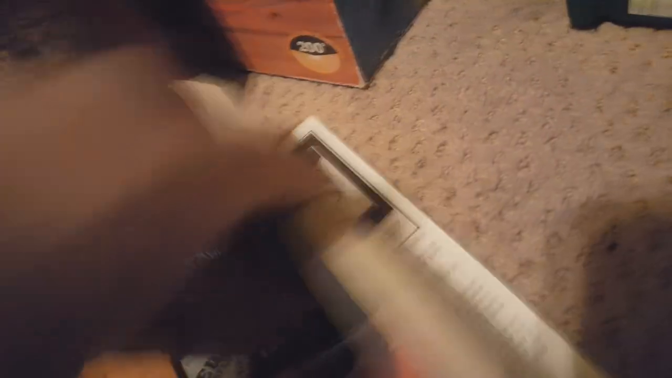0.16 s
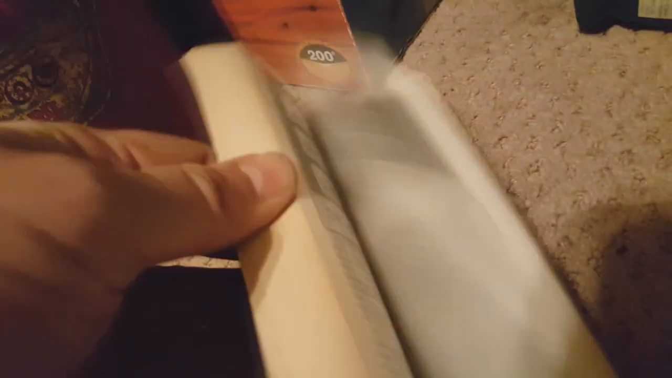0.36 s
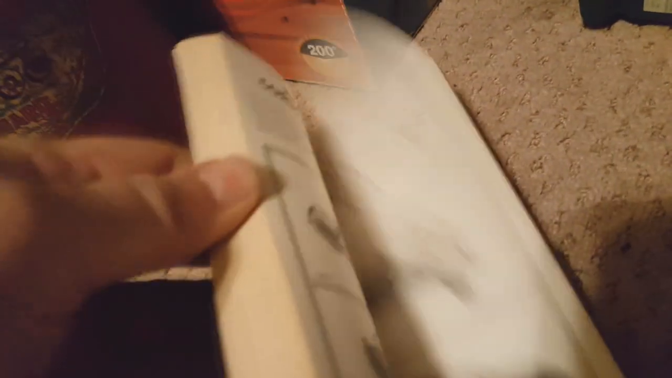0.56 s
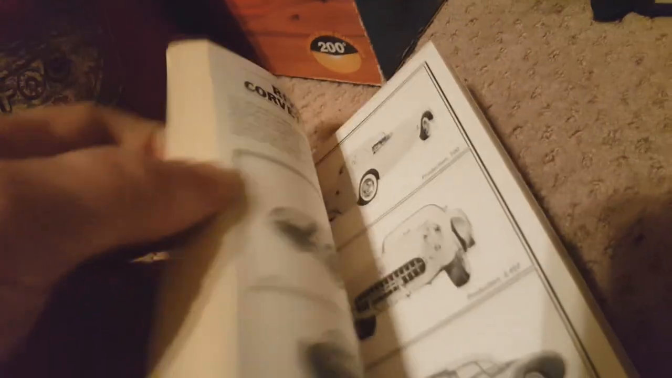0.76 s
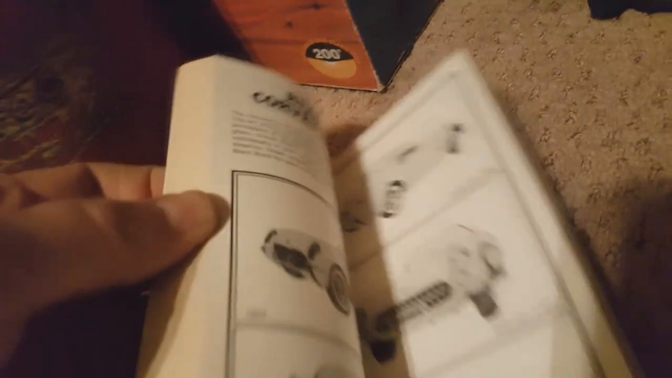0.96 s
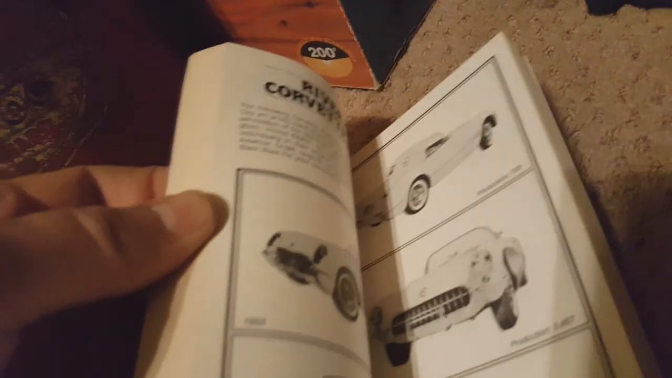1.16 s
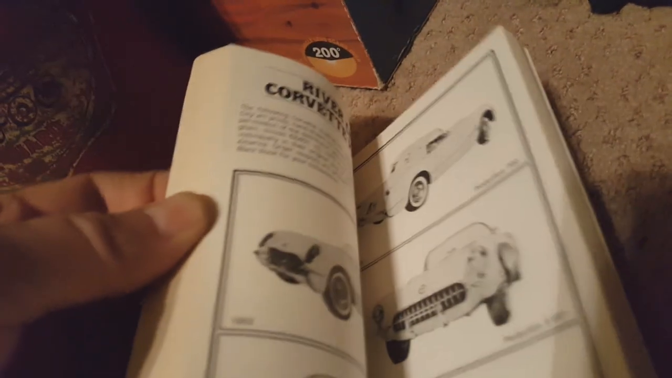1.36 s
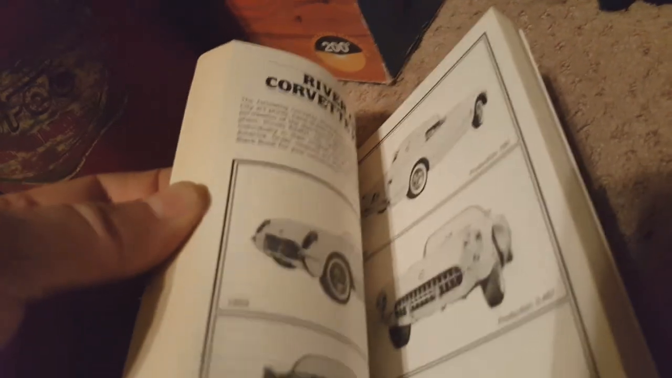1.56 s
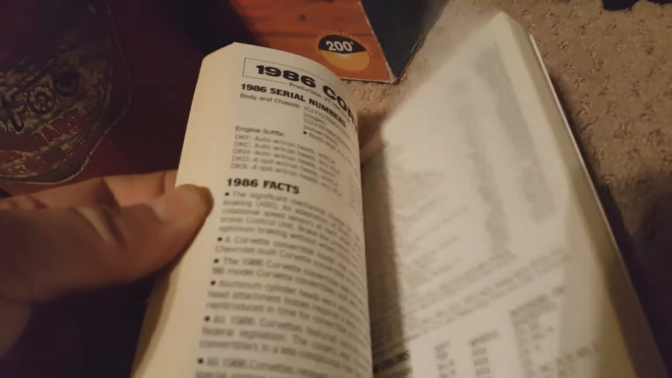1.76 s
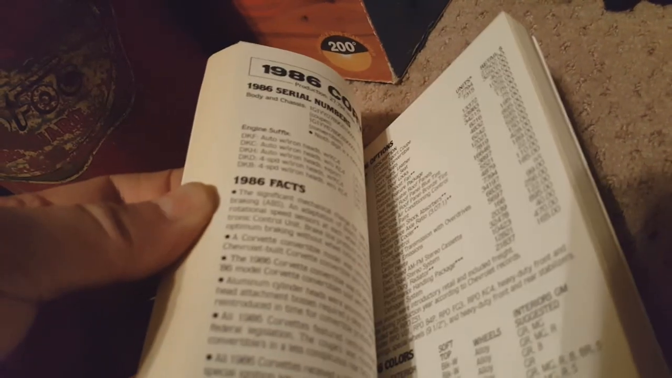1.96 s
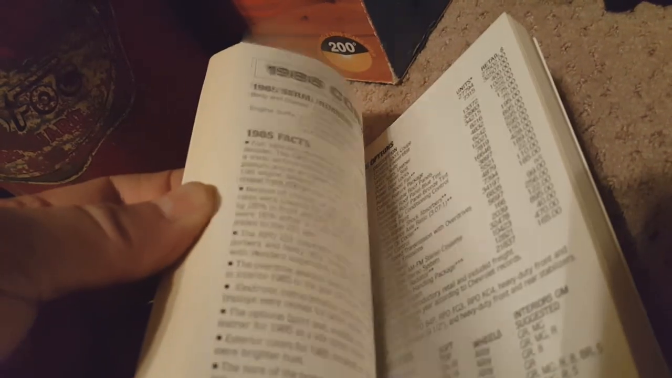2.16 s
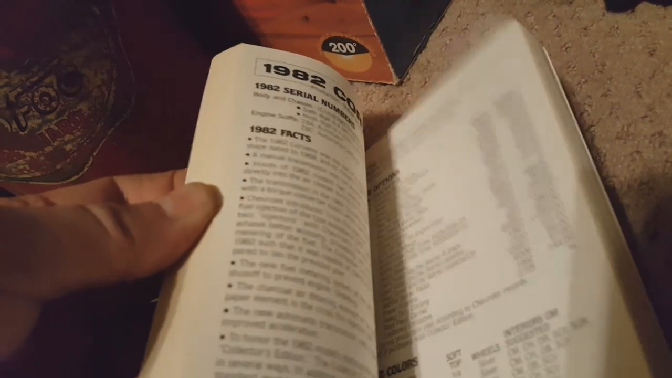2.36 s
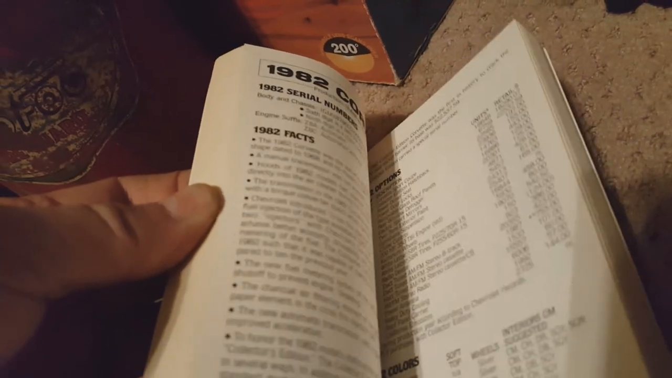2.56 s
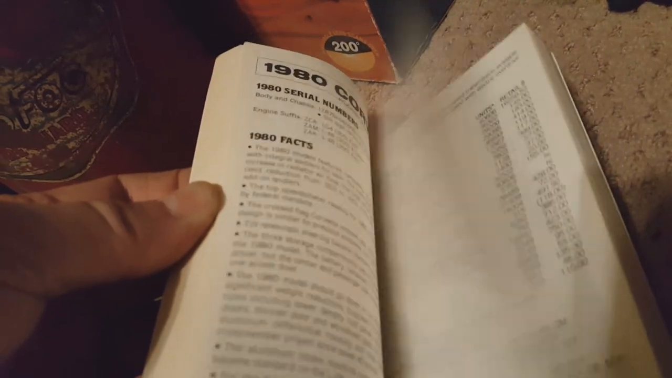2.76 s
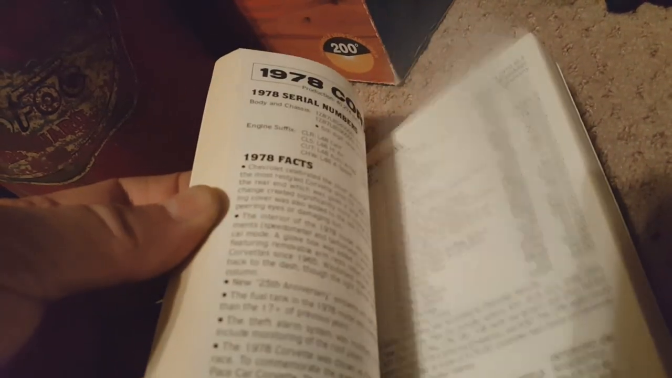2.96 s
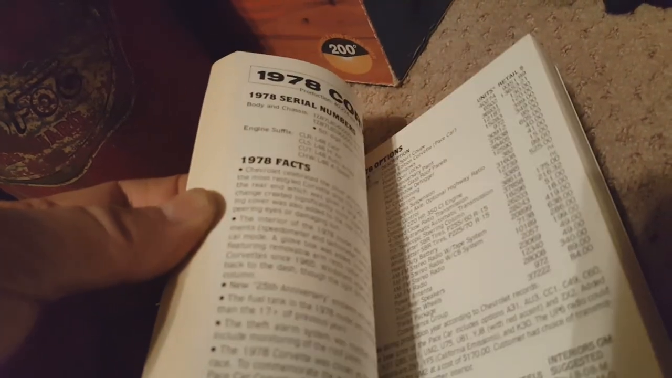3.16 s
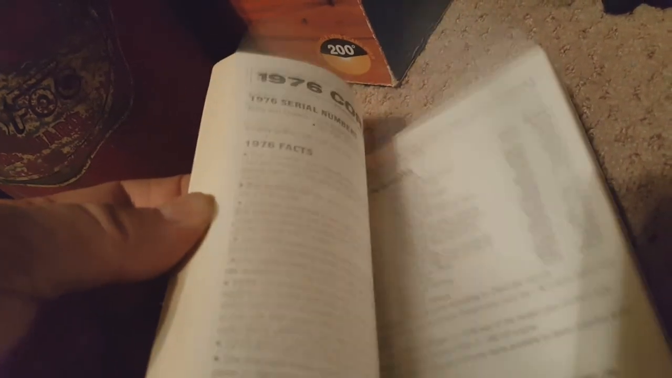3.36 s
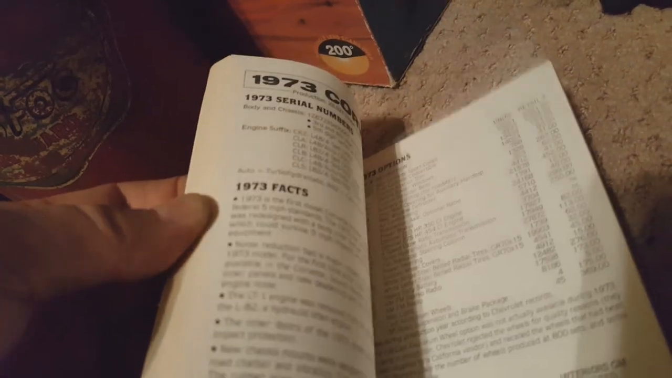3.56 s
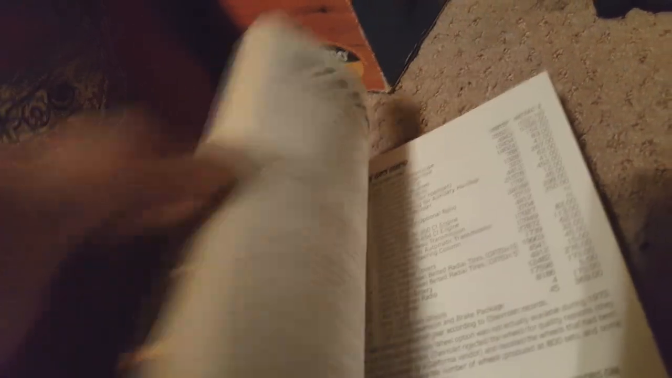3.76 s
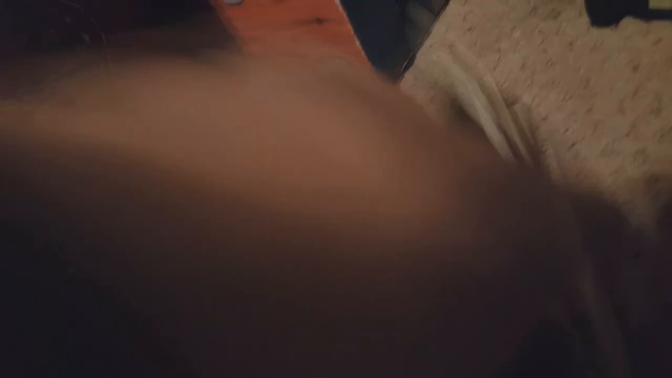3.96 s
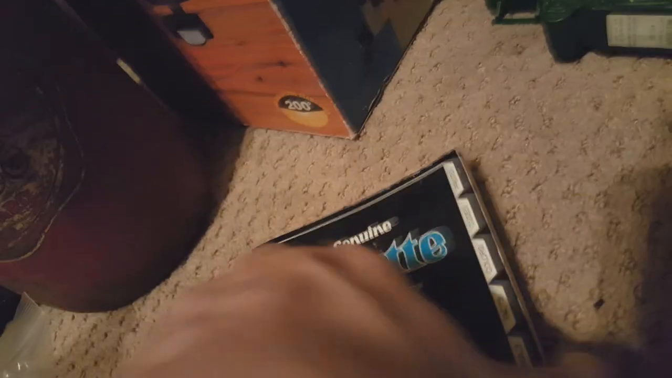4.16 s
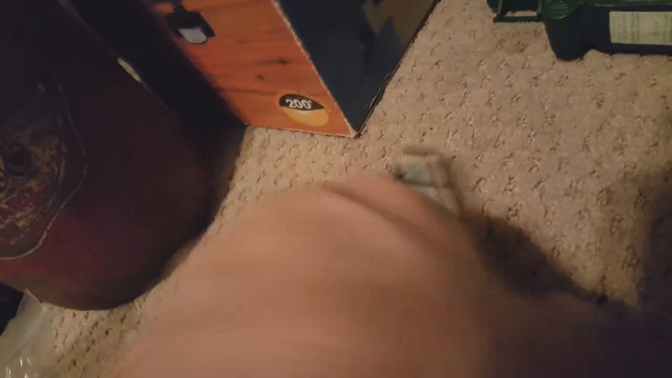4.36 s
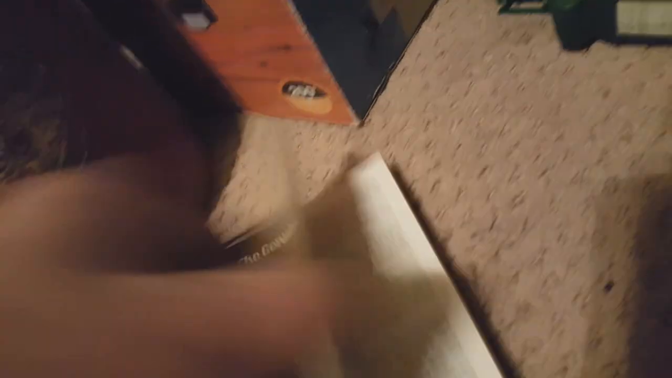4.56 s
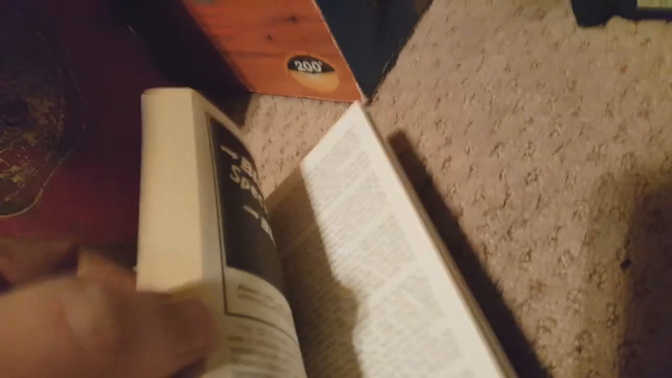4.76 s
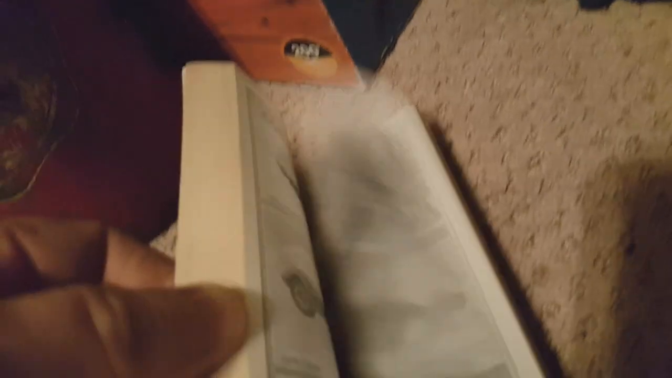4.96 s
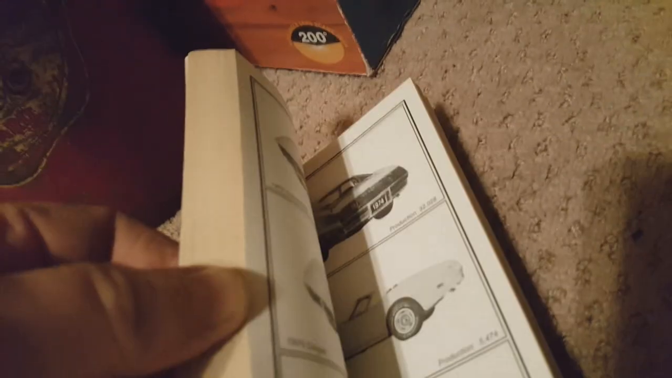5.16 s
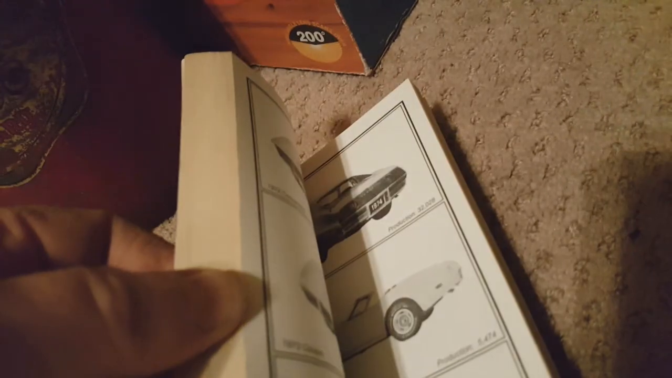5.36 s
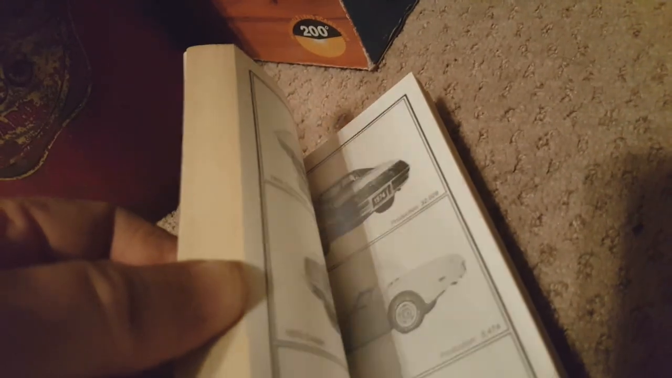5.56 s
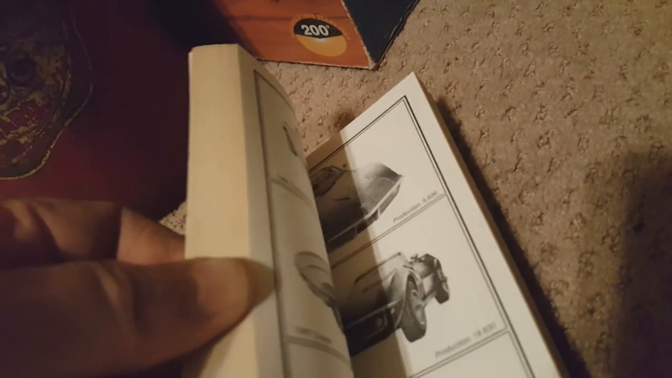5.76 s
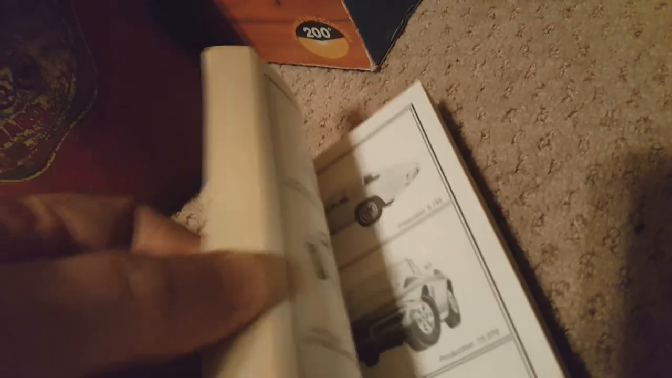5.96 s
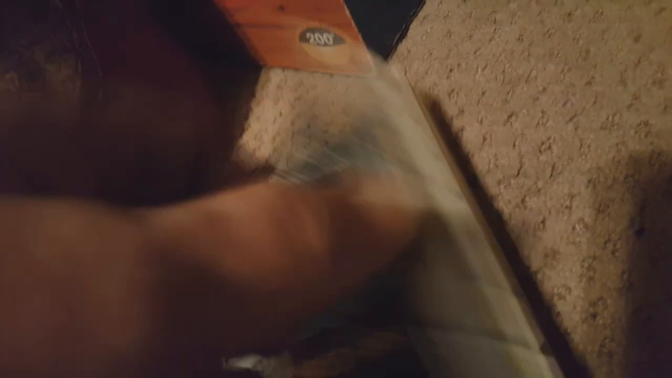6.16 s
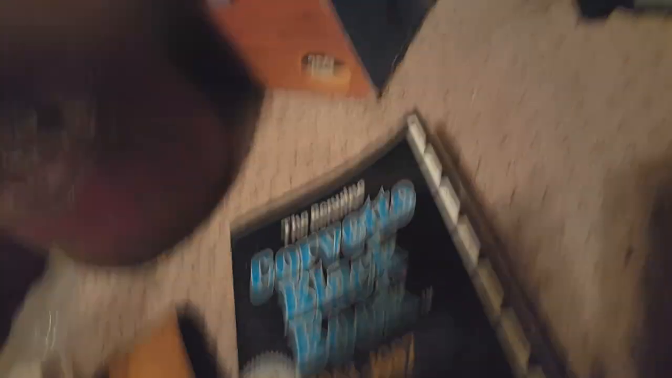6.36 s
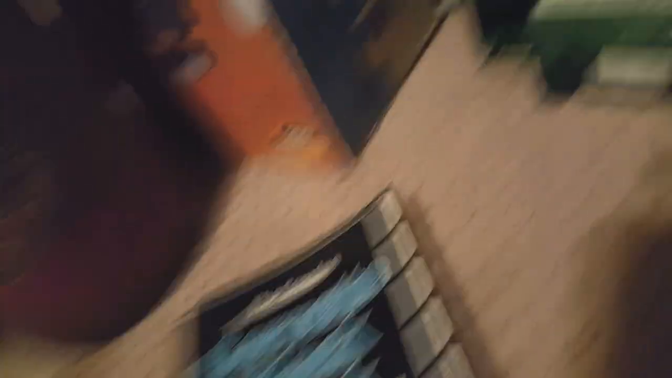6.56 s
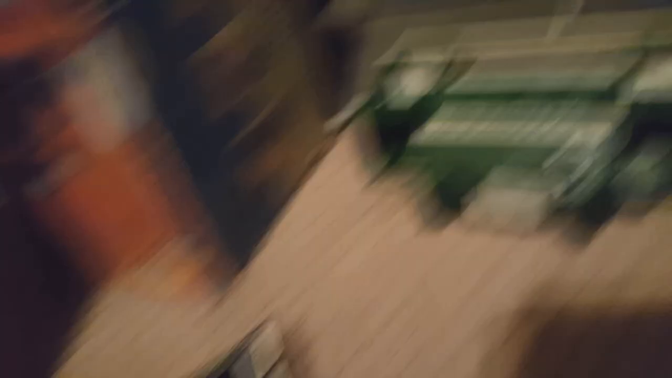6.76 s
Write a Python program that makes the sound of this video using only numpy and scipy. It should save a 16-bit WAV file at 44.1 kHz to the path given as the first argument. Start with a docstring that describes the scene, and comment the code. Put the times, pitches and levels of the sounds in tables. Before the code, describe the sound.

Dry, close paper sounds in a small carpeted room: a rustle and a burst of snapping page edges, then sparse page turns and another short flurry. A hand swishes over the cover with small knocks, the bent binding crackles and creaks, several pages are flipped, the book closes with a soft slap, and the handheld microphone gets bumped. Low room hum and slight hiss stay underneath.

```python
"""Thumbing through a paperback

A paperback lying on a carpet is opened twice and thumbed through, close to a handheld camera.
Page edges snap as short noise bursts; sliding sheets and rubbing skin are friction noise under strokes.
Stick-slip impulses ring the modes of the creaking cover; falling pages puff low noise at the right port.
At the end the book slaps shut and the camera is bumped: decaying sines with thuds and ticks.
A short room tail and a steady low drone with faint hiss lie behind."""
import sys
import numpy as np
from scipy import signal
from scipy.fft import rfft, irfft
from scipy.io import wavfile
from scipy.ndimage import uniform_filter1d

SR = 44100
rng = np.random.default_rng(int(sys.argv[2]) if len(sys.argv) > 2 else 0)


def transcribe(signal):
    """Save signal, clipped to [-1, 1], as a 16-bit WAV file at the path in sys.argv[1]."""
    frames = np.atleast_2d(signal).T
    limited = np.clip(frames, -1, 1)
    pcm = np.round(limited * 32767).astype(np.int16)
    wavfile.write(sys.argv[1], SR, pcm)


N = 304145  # length [samples]

# Levels in the tables are relative: the function that reads one may add an overall trim.
# Page edges snapping off the thumb:
# (time [s], level [dB], hollow between the pages [dB], brightness [dB])
FLICKS = [(.358, -22, 10.5, -6), (0.3892, -16.5, 9, -6), (0.3926, -9, -3, -11), (0.422, -16, 6, -3),
          (.424, -11, -3, -10), (0.4455, -12, 5, -13), (.463, -11, -4, -5), (.4814, -10, -0.5, -7),
          (0.5759, -9, -1.5, -7), (0.5876, -6, -7, -5), (0.5915, -9, 4, -7), (0.6031, -5, -11, -10),
          (0.6092, -9, -3, -11), (.614, -5.5, -0.5, -7), (0.623, -7.5, -6, -8), (1.6801, -11.5, 2, -8.5),
          (1.7714, -15, 3.5, -3), (2.24, -14, 2.5, 0.5), (2.3139, -11, 0, -4), (2.3597, -12.5, -1, -1),
          (2.702, -12.5, 2.5, -3.5), (2.8131, -12, 2.5, 0), (2.8823, -10, 0, 1), (2.9558, -26, 5, -16),
          (2.966, -6, -2, 1.5), (3.2836, -21, 6.5, -11), (3.3501, -16.5, 0.5, -1),
          (3.3792, -10.5, -4, -3.5), (3.4461, -9, 0.5, -10), (3.4689, -8, -1, -6.5), (3.959, -21.5, -2, -1),
          (4.014, -15.5, -0.5, 0), (5.0063, -14, 16.5, -9), (5.032, -19, 7, -6), (5.065, -14, 9, -2),
          (5.121, -10, 9, -6.5), (5.658, -12, 15.5, -2.5), (5.7149, -12, 2.5, -4.5), (5.9264, -14, 8, 1.5),
          (6.1186, -16, -3.5, -5.5)]
# Single stick-slip events of the bent cover: (time [s], level [dB])
SLIPS = [(4.532, -7.5), (4.5467, -19), (4.567, -3.5), (4.5873, -12), (4.5938, -2.5), (4.6053, -7),
         (4.639, 4), (4.6432, 0.5), (4.6511, -7), (4.6982, -12), (4.7002, 0), (4.714, -9), (4.7188, -9.5),
         (4.7833, -3.5)]
# Slips running together as the cover is forced: (time [s], level of one slip [dB])
CREAK = [(4.569, -20.5), (4.692, -22), (4.717, 2), (4.755, 2), (4.783, -3), (4.796, -31)]
# Dull blows on book and camera:
# (time [s], level [dB], pitch [Hz], ring t60 [s], tick level [dB], floor shudder level [dB])
KNOCKS = [(.1830, -21, 656, 0.031, -19, -24), (.1885, -24, 683, 0.026, -19, -34),
          (0.314, -38, 282, 0.029, -28, 3.5), (4.092, -35, 125, 0.029, -10, -9),
          (4.102, -31.5, 265, 0.015, -7, -3), (4.181, -32.5, 415, 0.0059, -9, -12),
          (6.217, -30.5, 1263, 0.027, -28, -25), (6.2925, -9, 262, 0.0087, -24.5, -10),
          (6.2978, -20, 477, 0.007, -19, -3.5), (6.652, -48, 908, 0.02, -17, 0),
          (6.7598, -31, 357, 0.1, -2.5, -4.5), (6.7655, -37, 430, 0.026, -2, 10.5),
          (6.777, -31.5, 313, 0.044, -3.5, -9)]
# Modes that a blow shakes in the shut book and the floor: (frequency [Hz], level [dB], t60 [s])
FLOOR_MODES = [(148, -13.5, 0.11), (187, -17.5, 0.044), (260, -34.5, 0.36), (319, -21, 0.1),
               (444, -18, 0.17), (558, -26.5, 0.088)]
# Air from a falling page hitting the right port:
# (time [s], level [dB], upper edge of the push [Hz], decay time of the wake [s])
PUFFS = [(1.926, -36.5, 156, 0.061), (2.466, -26.5, 236, 0.039), (2.987, -41, 150, 0.034),
         (3.045, -35, 141, 0.018), (3.592, -25, 242, 0.016)]
# Small dry ticks of a buckling sheet: (time [s], level [dB])
TICKS = [(0.2293, -15.5), (0.7747, -19.5), (1.447, -33.5), (1.485, -31), (1.57, -33), (1.582, -39),
         (2.642, -33), (2.779, -26), (3.614, -25), (6.134, -17), (6.174, -16.5)]
# Sheets sliding over paper: (time of greatest speed [s], level [dB], rise [s], fall [s],
# body [dB], brightness [dB], left-right difference [dB])
SHEET_STROKES = [(.18, -39, 0.17, 0.21, 1, -10, -0.5), (.39, -44, 0.089, .1, 2.5, -7.5, -3),
                 (.452, -31.5, .028, 0.026, -5, -10.5, 1.5), (.605, -35.5, 0.02, 0.021, 0, -3, 0),
                 (0.734, -47, 0.084, 0.074, -0.5, -6, -0.5), (0.809, -46, .05, 0.037, 3.5, -8.5, -0.5),
                 (.92, -70.5, 0.074, 0.21, 2, 4, -1), (1.06, -47, .11, 0.18, -1, -18.5, -2.5),
                 (1.47, -61, 0.25, 0.12, 5, -10.5, -1), (1.555, -52, 0.038, 0.058, 5.5, -24, 1),
                 (1.76, -58, 0.021, .025, 8, -13, 2), (2.325, -58, 0.023, 0.054, 10, -9, -2),
                 (2.875, -50.5, .025, 0.018, 3, -13, -1), (3.23, -60, 0.17, 0.065, 0.5, -17, 0),
                 (3.289, -44, 0.0046, 0.016, 11, -8, 0), (3.34, -47.5, 0.047, 0.072, 2, -12.5, 0),
                 (3.531, -44.5, 0.037, 0.044, 5, -8, -3), (4.87, -54, .08, 0.095, 5, -18, -1),
                 (5, -46.5, 0.13, 0.1, 2.5, -11, -1.5), (6.05, -59, 0.21, .1, 2, -12.5, -2.5),
                 (6.165, -45, 0.082, .09, -1.5, -6.5, -2), (6.195, -33, 0.017, 0.023, -4.5, -10.5, -2),
                 (6.219, -38.5, 0.02, 0.0097, 0.5, -4, 0), (6.319, -46, 0.11, 0.071, 2, -16.5, -2)]
# A hand rubbing evenly over cover or camera: (time of mid stroke [s], level [dB], rise [s], fall [s],
# body [dB], brightness [dB], left-right difference [dB])
HAND_STROKES = [(3.82, -53.5, 0.06, .05, -3, -6.5, 0), (3.95, -42.5, .11, .15, -6.5, -14.5, -2.5),
                (4.04, -45.5, 0.024, .03, 1, -7.5, -5), (4.09, -42, 0.025, 0.037, 4, -3, 4.5),
                (4.145, -44, 0.035, 0.036, 3, -2, 4.5), (4.235, -43.5, 0.055, 0.056, 3.5, -17.5, -1.5),
                (4.36, -51.5, 0.069, .08, 7, -5, -1.5), (4.47, -42, 0.12, 0.13, -1, -15.5, -3),
                (4.66, -42, 0.16, 0.16, 7.5, -4, -3), (6.785, -41, 0.024, 0.031, 5.5, -2.5, 2.5),
                (6.86, -47.5, .05, 0.034, 10.5, -8, 0.5)]

# Resonances of the cover: (frequency [Hz], bandwidth [Hz], level [dB])
COVER_MODES = [(218, 9.8, -11), (446, 22.4, 2.5), (648, 37, 4.5), (956, 37, 1.5), (1250, 34, -5.5),
               (1560, 250, -23), (1726, 24, -1.5), (1850, 94, 7), (2277, 68, -1.5), (2683, 45, -4),
               (3192, 186, -0.5), (3160, 62, -6), (3277, 60, -4), (3800, 76, -1), (3975, 36, -0.5),
               (4170, 160, -10), (5440, 73, -4.5), (7750, 400, -43)]
# Spectrum of the dry crack of a slip: (frequency [Hz], level [dB])
CRACK_SPECTRUM = [(100, -18), (400, -7), (1000, -18), (1900, -3.5), (3800, -4.5), (5000, -20),
                  (8500, -18.5), (10000, -31.5), (15000, -27.5)]
# Spectrum of a page snap: (frequency [Hz], level [dB])
SNAP_SPECTRUM = [(30, -14), (120, -2.5), (470, 1.5), (740, -2.5), (1350, 4.5), (1900, 1), (2300, -1),
                 (2900, 0.5), (4500, -5), (5500, -1), (7000, -2.5), (8600, 1), (9900, -9.5), (12000, -8.5),
                 (15500, -9.5)]
# Spectrum of paper friction: (frequency [Hz], level [dB])
SLIDE_SPECTRUM = [(30, -16), (120, -22.5), (300, 2.5), (550, -2.5), (900, -2), (1500, 0.5), (1950, -1),
                  (2600, 0), (3500, 3.5), (4800, -0.5), (5500, 0), (8400, 0), (10000, -12.5), (12000, -9.5),
                  (15500, -11.5)]
# Spectrum of the steady background: (frequency [Hz], level [dB])
AIR_SPECTRUM = [(20, -20.5), (60, -6), (100, -2), (128, 1), (175, -13), (215, -0.5), (275, -8), (335, -6.5),
                (450, -14), (800, -21.5), (2000, -21.5), (5000, -29.5), (10000, -35.5), (15500, -30.5)]

# Correlation of friction and background noise at the two ports: (frequency [Hz], correlation [-1 to 1])
PORT_CORRELATION = [(50, 1), (150, 0.84), (320, 0.78), (700, 0.4), (1400, 0), (3000, 0.01), (7000, -0.01),
                    (15000, 0)]
# Stereo balance of snaps: (frequency [Hz], left-right difference [dB])
SNAP_BALANCE = [(100, -10.5), (450, -5), (800, -6), (1350, 1), (2400, 0), (4000, -5.5), (9000, 3),
                (15000, 2)]
# How the cover faces the two ports: (frequency [Hz], left-right difference [dB])
COVER_BALANCE = [(400, -3.5), (700, -3), (1500, -5), (2000, -0.5), (3000, -16), (4200, -5.5), (6000, -10),
                 (12000, 8)]
# Decay of the room: (frequency [Hz], t60 [s])
ROOM_T60 = [(120, 0.44), (500, 0.033), (2000, 0.093), (6000, 0.056), (15000, 0.15)]

# Reach of the body control of a stroke: (frequency [Hz], share [0 to 1])
BODY_REACH = [(800, 1), (1150, 0)]
# Reach of the hollow between pages: (frequency [Hz], share [0 to 1])
HOLLOW_REACH = [(480, 0), (850, .5), (1350, 1), (1950, 1), (2450, 0)]
# Reach of the low push of a flick: (frequency [Hz], share [0 to 1])
PUSH_REACH = [(480, 1), (780, 0)]
# Reach of the brightness of a snap: (frequency [Hz], share [0 to 1])
SNAP_TREBLE_REACH = [(5000, 0), (8000, 1)]
# Reach of the brightness of a stroke: (frequency [Hz], share [0 to 1])
SLIDE_TREBLE_REACH = [(1700, 0), (5500, 1)]

# A page arched over a rounder hollow scrapes less: [dB with no hollow], [dB per dB of hollow]
SCRAPE_DB, SCRAPE_PER_HOLLOW = -1, -1.05
# The low push grows more slowly than its snap: [dB], [dB per dB of snap level], [dB per dB of hollow]
PUSH_DB, PUSH_PER_LEVEL, PUSH_PER_HOLLOW = -2.5, -0.68, 0.19
# The glide of a flicked page over its neighbour: level against its snap, times and colour
GLIDE_DB, GLIDE_RISE_S, GLIDE_FALL_S, GLIDE_BODY_DB, GLIDE_BRIGHT_DB = -49, 0.038, 0.068, 4, -10.5
# Harder bending slips faster: mean-wait scale at 0 dB [slips/s], and the power of the force it follows
SLIPS_PER_S, RATE_POWER = 460, .25
# Drop of a stroke one rise before or one fall after its middle; a sheet peaks, a hand holds its speed
STROKE_DROP_DB, SHEET_ROUNDNESS, HAND_ROUNDNESS = 11, 1.18, 2.4
AIR_DB = -64.5  # RMS level of the background in each channel
EDGE_HZ = 16050  # band limit of the camera

SIZE = 4096  # length of a short burst [samples]
LEAD = SIZE // 4  # samples ahead of the release of a snap
BINS = np.fft.rfftfreq(SIZE, 1 / SR)
AROUND = (np.arange(SIZE) - LEAD) / SR  # time about the release [s]


def amp(db):
    """Level: converts decibels to an amplitude ratio."""
    return 10 ** (np.asarray(db) / 20)


def unit(x):
    """Energy normalisation: scales each channel to an energy of 1."""
    return x / np.sqrt(np.sum(x ** 2, -1, keepdims=True) + 1e-20)


def read(points, hz):
    """Interpolation of a table along a logarithmic frequency axis."""
    f, value = np.transpose(points)
    return np.interp(np.log(hz + 1), np.log(f), value)


def sides(difference):
    """Symmetric split: half a left-right difference is given to each channel, with opposite signs."""
    return np.array([[.5], [-.5]]) * difference


def add(mix, s, sound):
    """Superposition: adds a stereo sound to the mix at a time in seconds."""
    part = mix[:, max(round(s * SR), 0):][:, :sound.shape[1]]
    part += sound[:, :part.shape[1]]


def correlate(a, b, correlation):
    """Partial correlation: mixes two independent signals into a pair of given correlation."""
    correlation = np.clip(correlation, -1, 1)
    return np.array([a, correlation * a + np.sqrt(1 - correlation ** 2) * b])


def noise_pair(correlation, count):
    """Two channels of white noise with partial correlation."""
    a, b = rng.standard_normal((2, count))
    return correlate(a, b, correlation)


def whiten(x, size):
    """Spectral whitening: divides out the smoothed spectrum of a burst and sets its energy to 1."""
    spectrum = rfft(x)
    smooth_power = abs(uniform_filter1d(abs(spectrum) ** 2, size, axis=-1))
    return unit(irfft(spectrum / np.sqrt(smooth_power + 1e-12), x.shape[-1]))


def colour(x, db):
    """Minimum-phase filtering: the Hilbert transform of the log gain on BINS gives a causal phase."""
    log_gain = np.log(amp(db))
    circle = np.concatenate([log_gain, log_gain[..., -2:0:-1]], -1)
    phase = -signal.hilbert(circle).imag[..., :len(BINS)]
    return irfft(rfft(x) * np.exp(log_gain + 1j * phase))


def burst(decay_s, correlation):
    """Broadband impulse: a fresh, whitened noise scratch with an exponential decay."""
    fade = np.exp(-np.arange(SIZE) / SR / decay_s)
    scratch = whiten(noise_pair(correlation, SIZE) * fade, size=90)
    return unit(scratch * np.sqrt(fade))


def port_noise(drive, field, size):
    """Time-varying filtering: shapes two noises by field(times, Hz) in dB, correlated as at the ports."""
    hz, t, (a, b) = signal.stft(drive, SR, nperseg=size, noverlap=size * 3 // 4)
    z = correlate(a, b, read(PORT_CORRELATION, hz)[:, None])
    z = z * amp(field(t, hz[:, None]))
    return signal.istft(z, SR, nperseg=size, noverlap=size * 3 // 4)[1][:, :N]


def flicks(rise_s=0.00044, snap_s=0.00081, lead_s=0.0028, tail_s=0.0041, correlation=0.35,
           lump_db=3, level_db=-0.5, pan_db=0.5, dull_db=-4, crisp_db=3):
    """Sudden elastic release: each edge scrapes over the thumb, snaps free and shivers for a moment."""
    out = np.zeros((2, N))
    release = np.exp(-abs(AROUND / np.where(AROUND < 0, rise_s, snap_s)))
    swell = np.exp(-abs(AROUND / np.where(AROUND < 0, lead_s, tail_s)))
    treble = read(SNAP_TREBLE_REACH, BINS)
    balance = sides(pan_db + read(SNAP_BALANCE, BINS))
    for s, db, hollow, bright in FLICKS:
        push = PUSH_DB + PUSH_PER_LEVEL * db + PUSH_PER_HOLLOW * hollow
        scrape = amp(SCRAPE_DB + SCRAPE_PER_HOLLOW * hollow)
        snap = whiten(noise_pair(correlation, SIZE) * release, size=50)
        # slow random level swings make the scrape and shiver uneven
        swings = np.interp(np.arange(SIZE), np.linspace(0, SIZE, 80), rng.standard_normal(80))
        shiver = whiten(noise_pair(correlation, SIZE) * amp(lump_db * swings) * swell, size=90)
        # the treble comes mostly with the instant of release
        snap = colour(snap, crisp_db * treble)
        shiver = colour(shiver, dull_db * treble)
        tone = read(SNAP_SPECTRUM, BINS) + push * read(PUSH_REACH, BINS)
        tone = tone + hollow * read(HOLLOW_REACH, BINS) + bright * treble
        sound = colour((snap + scrape * shiver) / np.hypot(1, scrape), tone + balance)
        add(out, s - LEAD / SR, amp(db + level_db) * sound)
    return out


def fibres(catches_per_s, catch_db, share):
    """Microscopic stick-slip: fibre catches as random impulses hold a share of the power of a fine hiss."""
    caught = rng.exponential(1, N)
    sizes = amp(catch_db * np.minimum(caught, 5)) * (rng.random(N) < catches_per_s / SR)
    catches = unit(sizes * rng.standard_normal((2, N))) * np.sqrt(N)
    share = np.clip(share, 0, 1)
    return np.sqrt(1 - share) * rng.standard_normal((2, N)) + np.sqrt(share) * catches


def crackle(per_s=45, size_db=2.0, crackle_db=15, crackle_s=0.00035):
    """Buckling: random short noise ticks, about 45 a second, roughen the friction of sliding sheets."""
    buckled = rng.exponential(1, N)
    sizes = amp(size_db * np.minimum(buckled, 3)) * (rng.random(N) < per_s / SR)
    fade = unit(np.exp(-np.arange(400) / SR / crackle_s))
    return amp(crackle_db) * signal.oaconvolve(sizes, fade)[:N] * rng.standard_normal((2, N))


def slide(strokes, drive, roundness, patch_db, flutter_db, hollow_share=0.17):
    """Sliding friction: noise swells and fades with each stroke, with shifting patches and a flutter."""
    def field(t, hz):
        """Power addition: sums the coloured strokes and adds random level variations."""
        tones, swells, f = [], [], hz.ravel()
        for s, db, rise, fall, body, bright, pan in strokes:
            away = abs((t - s) / np.where(t < s, rise, fall))
            swells.append(amp(db - STROKE_DROP_DB * away ** roundness) ** 2)
            tone = read(SLIDE_SPECTRUM, f) + body * read(BODY_REACH, f)
            tone += bright * read(SLIDE_TREBLE_REACH, f)
            # a soft, dull slide sounds mostly the gap between the sheets
            tone -= hollow_share * bright * read(HOLLOW_REACH, f)
            tones.append(amp(tone + sides(pan)) ** 2)
        power = np.stack(tones, axis=-1) @ np.array(swells)
        patches = uniform_filter1d(rng.standard_normal((len(f), len(t))), size=4, axis=0)
        patches = uniform_filter1d(patches, size=24, axis=1)
        flutter = uniform_filter1d(rng.standard_normal(len(t)), size=5)
        variation = patch_db * patches / patches.std() + flutter_db * flutter / flutter.std()
        return 10 * np.log10(power + 1e-14) + variation
    return port_noise(drive, field, size=256)


def sheets(level_db=-0.56, glide_per_hollow=-0.27):
    """Paper friction: sheets slide and crackle; every flicked page also glides over its neighbour."""
    glides = []
    for s, db, hollow, _ in FLICKS:
        glide_db = db + GLIDE_DB + glide_per_hollow * hollow
        glides.append((s, glide_db, GLIDE_RISE_S, GLIDE_FALL_S, GLIDE_BODY_DB, GLIDE_BRIGHT_DB, 0))
    drive = fibres(catches_per_s=900, catch_db=2.5, share=0.26) + crackle()
    friction = slide(SHEET_STROKES + glides, drive, SHEET_ROUNDNESS, patch_db=1.9, flutter_db=1.6)
    return amp(level_db) * friction


def hand(level_db=-0.5):
    """Skin friction: a hand rubs in a smooth swish, without crackle."""
    drive = fibres(catches_per_s=1500, catch_db=2.0, share=0.11)
    return amp(level_db) * slide(HAND_STROKES, drive, HAND_ROUNDNESS, patch_db=1.5, flutter_db=1.3)


def ticks(tick_s=0.0022, dull_db=-9):
    """Buckling: the clearest clicks of a sheet are short bursts in the colour of paper friction."""
    out = np.zeros((2, N))
    tone = read(SLIDE_SPECTRUM, BINS) + dull_db * read(SLIDE_TREBLE_REACH, BINS)
    for s, db in TICKS:
        add(out, s, amp(db) * colour(burst(tick_s, 0.32), tone))
    return out


def creak(jitter=0.38, spread_db=1.5, slip_db=2.0, run_db=-1.7, slip_s=0.0012,
          correlation=0.84, cross=0.81, crack_db=0):
    """Stick-slip excitation of resonances: single slips and a fast uneven run ring the stiff cover."""
    force = np.zeros((2, N))
    for s, db in SLIPS:
        add(force, s, amp(db + slip_db) * burst(slip_s, correlation))
    times, levels = np.transpose(CREAK)
    s = times[0]
    for wait, strength in rng.standard_normal((120, 2)):
        scratch = burst(slip_s, correlation)
        if s < times[-1]:
            bend_db = np.interp(s, times, levels)
            add(force, s, amp(bend_db + run_db + spread_db * strength) * scratch)
            s += np.exp(jitter * wait) / (SLIPS_PER_S * amp(bend_db) ** RATE_POWER)
    t = np.arange(SIZE) / SR
    crack = colour(signal.unit_impulse(SIZE), read(CRACK_SPECTRUM, BINS) + crack_db)
    response = np.zeros((2, SIZE)) + crack
    for k, (hz, width, db) in enumerate(COVER_MODES):
        # higher modes reach the two ports less in step, up to 2 kHz
        phase = k * np.pi / 2 + sides(cross * (-1) ** k * min(hz / 1000, 2))
        decay = 2 * np.pi * width / SR * np.exp(-np.pi * width * t)
        response += amp(db) * decay * np.sin(2 * np.pi * hz * t + phase)
    response = colour(response, sides(read(COVER_BALANCE, BINS)))
    return signal.oaconvolve(force, response, axes=1)[:, :N]


def knocks(rise_s=0.00064, tick_s=0.0056, tick_edge_hz=2500, pan_db=-2.5, low_hz=125,
           thud_db=-4, thud_s=0.0055):
    """Impact excitation: a soft blow gives a low ring, a dull thud, a papery tick and a floor shudder."""
    out, t = np.zeros((2, N)), np.arange(SR // 3) / SR
    shudder = sum(amp(db - 60 * t / t60) * np.sin(2 * np.pi * hz * t) for hz, db, t60 in FLOOR_MODES)
    tick_filter = signal.butter(1, tick_edge_hz, fs=SR)
    for s, db, hz, t60, tick_db, floor_db in KNOCKS:
        ring = amp(-60 * t / t60) * np.sin(2 * np.pi * hz * t)
        thud_filter = signal.butter(2, [hz / 2, hz * 2.5], "band", fs=SR)
        thud = signal.lfilter(*thud_filter, noise_pair(0.99, len(t))) * np.exp(-t / thud_s)
        tick = signal.lfilter(*tick_filter, noise_pair(0.13, len(t))) * np.exp(-t / tick_s)
        blow = ring + amp(thud_db) * thud + amp(tick_db) * tick + amp(floor_db) * shudder
        blow = blow * (1 - np.exp(-t / rise_s))
        add(out, s, amp(db + sides(pan_db)) * blow)
    # so small a body radiates little bass
    return signal.lfilter(*signal.butter(2, low_hz, "high", fs=SR), out)


def eddy(envelope, edge_hz, low_hz=64):
    """Turbulent pressure: band-limited noise makes a few slow swings under an envelope."""
    hz = np.fft.rfftfreq(len(envelope), 1 / SR)
    swirl = whiten(rng.standard_normal(len(envelope)) * envelope, size=30)
    band = hz ** 2 / (hz ** 2 + low_hz ** 2) / (1 + (hz / edge_hz) ** 4.97)
    return unit(irfft(rfft(swirl) * band)) * np.linalg.norm(envelope)


def puffs(left_db=-32, push_s=0.0036, push_db=2.0, wake_db=-3, wake_edge_hz=112):
    """Flow noise at a port: a quick push of air hits the right one; a wake of slower eddies dies away."""
    out, t = np.zeros((2, N)), np.arange(-SIZE, 4 * SIZE) / SR
    for s, db, edge_hz, wake_s in PUFFS:
        push = amp(push_db) * eddy(np.exp(-(t / push_s) ** 2), edge_hz)
        wake = amp(wake_db) * eddy((t > 0) * np.exp(-abs(t) / wake_s), wake_edge_hz)
        add(out, s + t[0], amp(db + np.array([[left_db], [0]])) * (push + wake))
    return out


def room(x, delay_s=0.011):
    """Reverberation: a small carpeted room adds a scattered noise tail whose decay varies with frequency."""
    hz, t, z = signal.stft(rng.standard_normal((2, SR // 2)), SR, nperseg=256)
    decay = amp(-60 * t / read(ROOM_T60, hz)[:, None])
    tail = signal.istft(z * decay, SR, nperseg=256)[1]
    tail *= np.arange(tail.shape[1]) / SR > delay_s
    return signal.fftconvolve(x, unit(tail), axes=1)[:, :N]


def air():
    """Stationary background noise: the steady low drone of the room and a faint hiss."""
    noise = port_noise(rng.standard_normal((2, N)), lambda t, hz: read(AIR_SPECTRUM, hz), size=4096)
    return amp(AIR_DB) * np.sqrt(N) * unit(noise)


def scene(room_db=-17):
    """Superposition: the book in its room, the puffs right at the microphone and the background."""
    book = flicks() + sheets() + hand() + ticks() + creak() + knocks()
    return book + amp(room_db) * room(book) + puffs() + air()


def record(dry):
    """Band limitation: a linear-phase low-pass filter sets the upper edge of the camera."""
    low_pass = signal.firwin(301, EDGE_HZ, window=("kaiser", 8), fs=SR)
    return signal.oaconvolve(dry, low_pass[None], "same")


dry = scene()
out = record(dry)
transcribe(out)
```